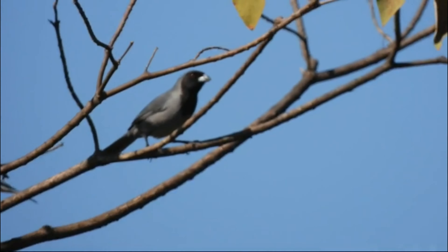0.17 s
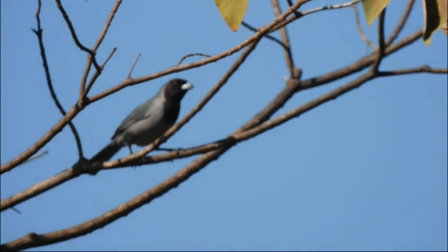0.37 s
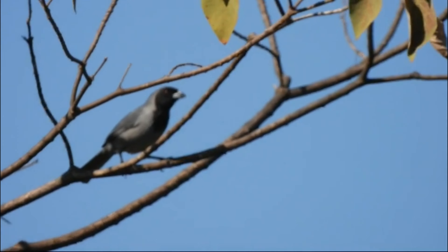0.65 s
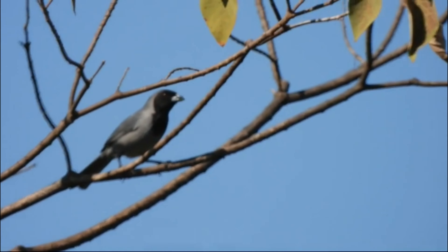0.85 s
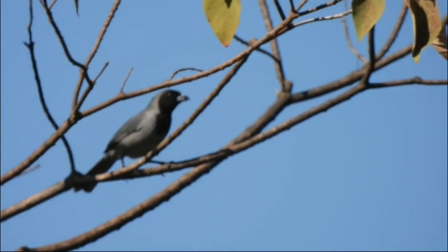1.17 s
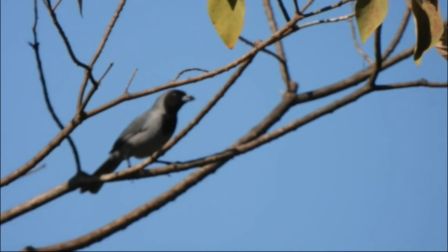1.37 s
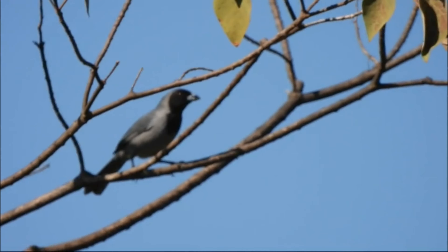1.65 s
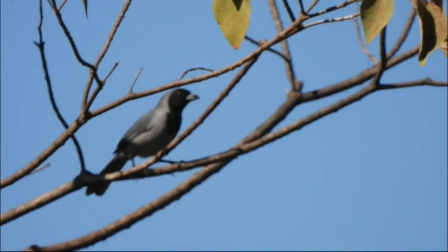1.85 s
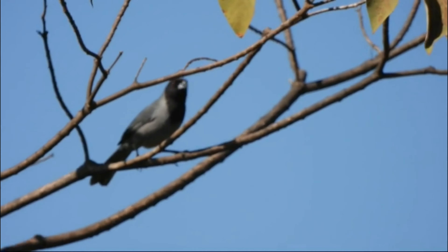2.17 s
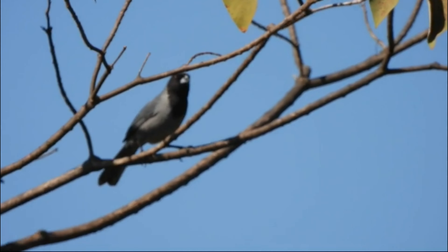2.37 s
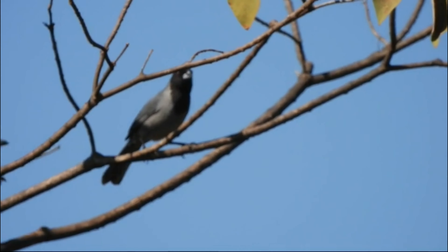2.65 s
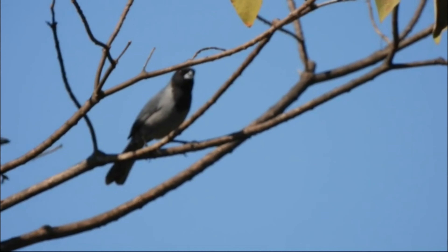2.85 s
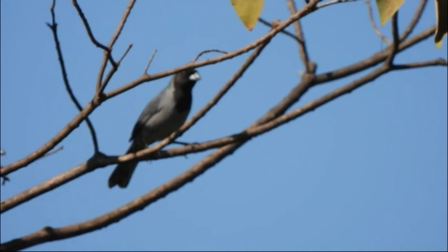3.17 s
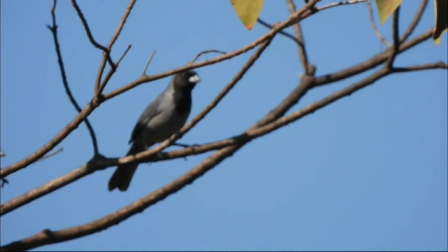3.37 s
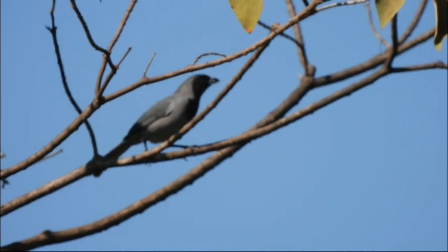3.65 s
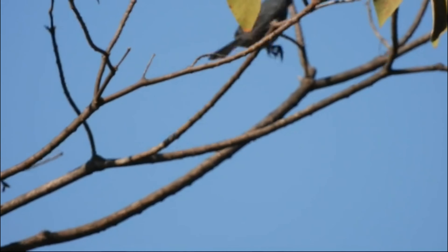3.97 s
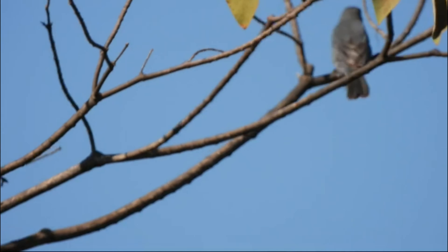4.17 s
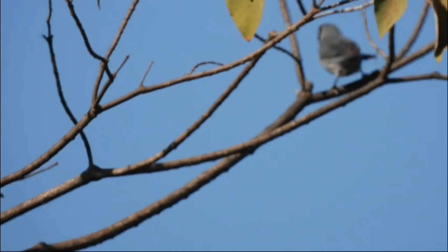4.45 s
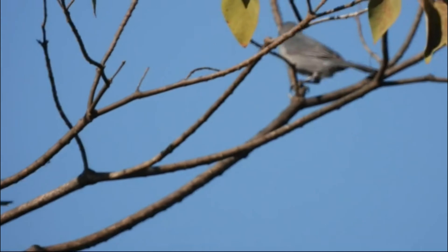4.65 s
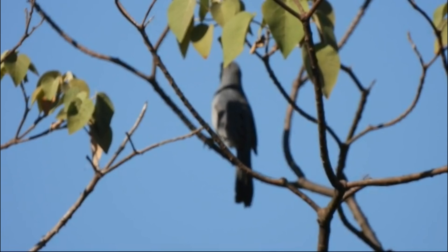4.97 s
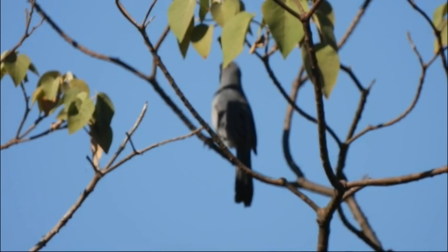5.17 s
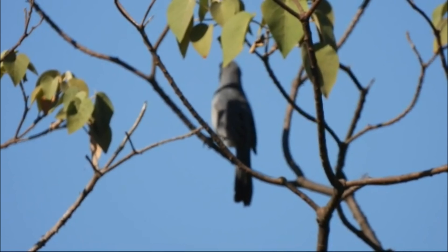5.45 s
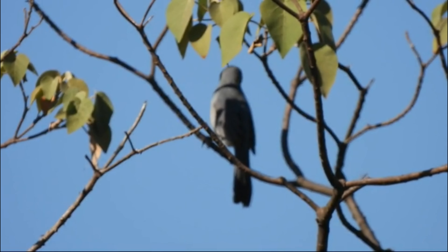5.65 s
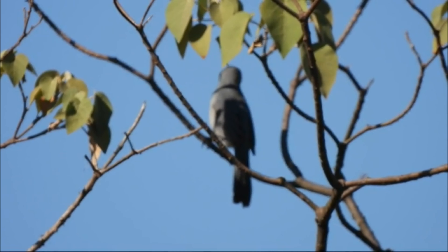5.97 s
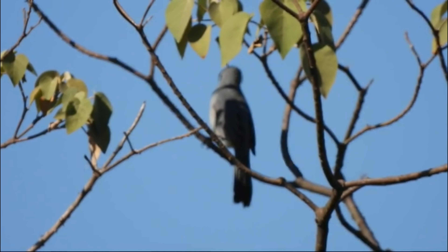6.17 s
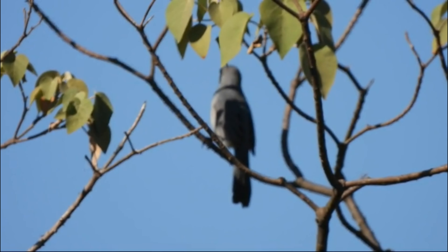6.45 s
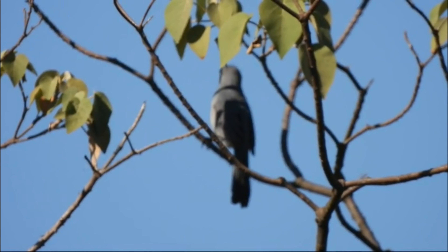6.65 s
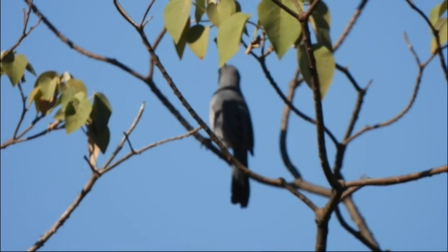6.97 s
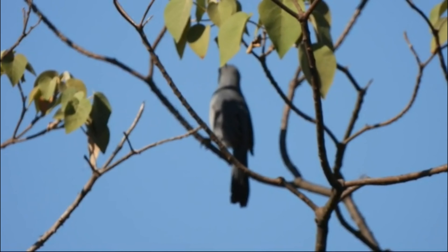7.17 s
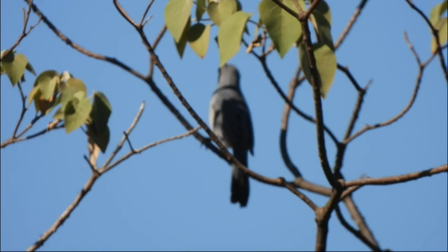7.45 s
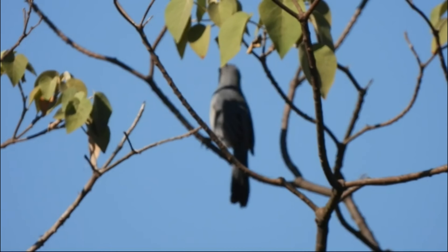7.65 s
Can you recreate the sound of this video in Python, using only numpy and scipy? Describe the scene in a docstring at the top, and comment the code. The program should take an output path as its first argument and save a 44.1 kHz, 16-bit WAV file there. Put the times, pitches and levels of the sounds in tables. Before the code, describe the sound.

From 0 to 3.75 s a nearby songbird whistles clear, rapid notes sliding between roughly 1.7 and 4.2 kHz, about four a second, in four run-together phrases; strong down-slurs stand out near 0.9, 1.8 and 2.6 s. The last phrase slows to a drawl at 3.3 s and a swelling, rising note at 3.55 s. Trees give a long soft echo. Behind are small chips, faint chatter, high insect trills, and low hoarse far-bird notes from 2.75 to 4.25 s. Low hand rumble carries soft thuds, notably at 1.85-2.4 s. The echo cuts off at 4.27 s, the rumble at 4.9 s. Then quiet hiss, sparse distant calls, a brief cricket at 4.3-4.85 s and again from 6.2 s, faint rustles near 7 s, and short chirps from 7.3 s until the end.

```python
"""Four quick phrases of swept whistles from a tanager, echoed by the trees, over a soft outdoor hiss.
Other birds, a cricket and trilling insects call farther off; the camera rumbles and thuds in the hand.
The song's echo stops short at 4.27 s, the rumble at 4.9 s.
Whistles and calls are gliding sines; hiss, rumble, taps and trills are shaped noise;
echoes are delayed copies and sparse random impulse responses."""
import sys
import numpy as np
from scipy import signal
from scipy.fft import rfft, irfft, next_fast_len
from scipy.io import wavfile
from scipy.ndimage import uniform_filter1d

SR = 44100
rng = np.random.default_rng(int(sys.argv[2]) if len(sys.argv) > 2 else 0)


def to_wav(sig):
    """Store sig (one row per channel, or 1-D mono) as 16-bit WAV at the path in sys.argv[1].

    Samples outside -1..1 are clipped; the rate is SR.
    """
    pcm = np.clip(np.atleast_2d(sig), -1, 1) * 32767
    pcm = np.round(pcm).astype(np.int16)
    wavfile.write(sys.argv[1], SR, pcm.T)  # frames by channels


N = 344421
TIME_S = np.arange(N) / SR
ECHO_END_S, RUMBLE_END_S = 4.272, 4.895

# Outdoor hiss spectrum. Each row: frequency in Hz, relative level in dB.
AIR_SPECTRUM = [(15, -27.5), (35, -11), (65, 0.0), (130, -10), (250, -14), (500, -16.5), (1000, -19.5),
                (2000, -18), (3000, -24.5), (4200, -25.5), (6300, -27), (8200, -32), (11500, -36),
                (15000, -40)]
# Handling rumble spectrum. Each row: frequency in Hz, relative level in dB.
RUMBLE_SPECTRUM = [(15, -8.5), (30, -10), (52, 1.5), (68, 0), (85, -14.5), (110, -19), (150, -30),
                   (220, -39), (400, -46.5), (1500, -100)]
# Handling rumble course. Each row: time in seconds, level in dB before the overall rumble gain.
RUMBLE_COURSE = [(0.0, -47.5), (0.58, -52.5), (0.79, -51.5), (1.04, -46), (1.71, -48.5), (2.39, -43.5),
                 (2.53, -46), (2.86, -53.5), (3.25, -52.5), (3.56, -46.5), (3.96, -50.5), (4.42, -45.5),
                 (4.7, -52), (4.84, -50.5)]
# Knocks of the hand on the camera. Each row: start in seconds, level in dB before the soft onset,
# pitch in Hz, decay time constant in seconds.
KNOCKS = [(1.854, -17, 68.3, 0.016), (2.138, -28, 69, 0.048), (2.226, -21.5, 60.8, 0.033),
          (2.415, -20, 58.3, 0.028), (3.872, -30, 94, 0.012), (4.345, -33, 105.7, 0.02),
          (4.48, -25, 55.3, 0.016), (4.849, -31.5, 89.3, 0.019)]
# Dull taps and dry ticks. Each row: start in seconds, level in dB, band centre in Hz,
# decay time constant in seconds.
TAP_EVENTS = [(.129, -36.5, 860, 0.0055), (.798, -47, 1360, 0.0048), (2.63, -37.5, 855, 0.0038),
              (2.537, -36, 2205, 0.0015), (3.75, -54.5, 5200, .009), (5.398, -51.5, 2770, .003),
              (5.398, -54.5, 6130, .004), (7.361, -49.5, 1210, 0.011), (7.398, -48.5, 1340, 0.011)]
# Soft rustles. Each row: start in seconds, level in dB.
RUSTLE_EVENTS = [(6.785, -57), (6.97, -55), (7.191, -53.5)]
# Far trilling insects. Each row: start in seconds, end in seconds, band centre in Hz,
# mean pulses per second, level in dB before pulsing.
INSECT_TRILLS = [(0, 3.3, 7240, 14, -71), (0, 4.27, 6238, 17, -69), (4.301, 6.3, 4720, 15, -73)]
# Cricket bouts. Each row: start in seconds, end in seconds, seconds from chirp to chirp, mean level in dB.
CRICKET_BOUTS = [(4.298, 4.85, .127, -58), (6.177, 7.81, .1235, -59)]
# Low, drawn-out notes of a far bird. Each row: start in seconds, length in seconds,
# fundamental in Hz, mean level in dB, rasp from 0 to 1.
LOW_BIRD_NOTES = [(2.751, 0.25, 614, -52, 0.56), (3.044, .16, 684, -49.5, 0.58),
                  (3.166, 0.24, 638, -50, 0.36), (3.394, 0.16, 638.5, -43.5, .1),
                  (3.748, .52, 634, -53.5, 0.78)]
# Kinds of far call by name. Each entry: rasp from 0 to 1, pitch factors at even steps through the call.
CALL_KINDS = { "down": (0.22, [1.22, 0.94, .78]), "up": (0.22, [.84, .94, 1, 1.04, 1.06]),
              "arch": (0.19, [0.98, 1, 1, .97]), "held": (0.1, [1, 1]), "sag": (.4, [1.06, 0.98, .94]),
              "buzz": (.9, [1.2, 0.94, .94]), "tilde": (0.18, [.96, .91, 1.04, 1.01, 0.97]),
              "vee": (0.5, [1.15, 1, .88, 1.02, 0.81]), }
# Clearer calls of other birds. Each row: start in seconds, kind, length in seconds,
# reference pitch in Hz, mean level in dB.
CLEAR_CALLS = [ (0.259, "down", 0.022, 2980, -43), (0.366, "down", 0.025, 3050, -37.5),
               (0.447, "arch", 0.17, 4700, -59), (0.468, "down", 0.027, 3040, -36.5),
               (0.696, "arch", .06, 5150, -53), (.719, "up", .096, 3410, -47),
               (.725, "up", 0.055, 2620, -51), (0.823, "held", 0.066, 4210, -55),
               (1.032, "arch", .12, 5015, -59), (1.053, "sag", 0.028, 4070, -48),
               (1.1, "up", 0.11, 3850, -49), (1.186, "down", 0.064, 4240, -58.5),
               (1.361, "held", 0.094, 4960, -57), (1.594, "down", .074, 6070, -49),
               (1.593, "down", 0.077, 8300, -56), (1.597, "up", .08, 2580, -50),
               (1.605, "up", .12, 3565, -47.5), (2.001, "buzz", 0.09, 4150, -49),
               (2.39, "up", 0.12, 3480, -51.5), (2.794, "up", 0.065, 3600, -50),
               (2.902, "arch", 0.088, 4900, -55), (3.303, "arch", 0.13, 5080, -62.5),
               (3.557, "held", .056, 5320, -52), (3.661, "arch", .1, 4970, -65.5),
               (3.724, "held", 0.097, 4140, -57.5), (3.986, "held", 0.26, 4160, -61.5),
               (4.036, "held", 0.11, 1860, -57.5), (4.464, "sag", 0.37, 3370, -65),
               (4.466, "sag", .34, 2990, -61), (4.472, "sag", 0.3, 2736, -63),
               (4.893, "up", 0.021, 3550, -57), (4.922, "held", .3, 3024, -64.5),
               (4.93, "held", 0.073, 1950, -62), (4.94, "sag", .17, 2310, -67),
               (5.065, "held", 0.048, 3006, -54), (5.202, "held", .09, 1767, -57.5),
               (5.645, "held", 0.052, 4920, -64), (5.823, "down", 0.09, 4480, -67.5),
               (5.939, "held", 0.081, 3060, -62.5), (6.189, "up", 0.054, 3350, -57),
               (6.224, "down", 0.041, 3270, -60.5), (6.382, "up", 0.0342, 3140, -59),
               (6.404, "arch", 0.088, 3280, -55.5), (6.435, "up", 0.17, 6000, -60),
               (6.472, "sag", 0.18, 3450, -61), (6.502, "sag", 0.28, 2810, -63.5),
               (7.288, "tilde", 0.048, 3230, -50.5), (7.373, "vee", 0.06, 3620, -50.5),
               (7.545, "tilde", 0.082, 3180, -50.5), (7.636, "vee", 0.064, 3600, -47.5),
               (7.777, "up", 0.065, 2980, -53), ]
# Faint chatter. Each row: start in seconds, end in seconds, calls per second,
# mean reference pitch in Hz, mean level in dB.
FAINT_CHATTER = [(0, 2.8, 6, 2726, -51), (4.3, 6.7, 2.5, 2320, -69.5)]
# Reflections from near branches. Each row: delay in seconds, level in dB.
BRANCH_ECHOES = [(.0031, -25), (.0074, -12.5), (0.0115, -22.5), (0.022, -18.5), (0.033, -24.5),
                 (0.045, -24)]
# Passage through the throat. Each row: whistle pitch in Hz, gain in dB.
THROAT_GAIN = [(1700, -17.5), (1950, -8.5), (2150, -5.5), (2400, -2.5), (2850, -1.13), (3200, -1.8),
               (3550, -3.5), (4200, -17.5)]
# Tanager syllables by name; in most, one side of the syrinx leads in and hands over to the other.
# Each entry: handover in seconds, initial lead-in level in dB, dip at the handover in dB,
# release in seconds, swell from start to end in dB, pitch path of (seconds, Hz) points.
# The times of handover and path are before stretching.
SYLLABLE_SHAPES = { "hook": (.027, -13.5, -10, 0.014, 0, [(0, 3582), (.02, 3512), (.075, 2732),
                   (.104, 2700)]), "slur": (0.031, -13, -6, .017, -3.9, [(0, 4218), (.016, 4015),
                   (.04, 3292), (.06, 2891), (.096, 2545)]),
                   "rise": (.04, -12.5, -8, .019, 0.67, [(0, 1850), (.034, 1970), (.072, 2320),
                   (.115, 2572), (.155, 2900), (.195, 3530)]),
                   "peak": (.046, 0, -8.5, 0.024, .4, [(0, 2310), (.034, 3105), (.047, 3797), (.06, 2630),
                   (.075, 2270), (.1, 1910)]), "low": (.037, -13, -18, 0.014, -4.5, [(0, 1683),
                   (.036, 1790), (.052, 1930), (.08, 2060), (.105, 2124)]),
                   "fall": (0, 0, 0, 0.019, .5, [(0, 3130), (.014, 3028), (.052, 2480), (.1, 2010)]),
                   "drawl": (0, 0, 0, 0.018, 0, [(0, 1935), (.042, 2344), (.065, 2362), (.11, 2255),
                   (.215, 2088)]), "query": (0, 0, 0, 0.035, 13.5, [(0, 2054), (.02, 2376), (.1, 2524),
                   (.18, 3040)]), }
# The song. Each row: start in seconds, syllable, length factor, pitch factor,
# level in dB before throat gain and envelopes.
SONG_NOTES = [ (.055, "hook", 0.99, 1, -14), (.298, "rise", .84, 0.99, -15),
              (.513, "peak", 0.93, 1.02, -13), (.761, "low", 1.04, 1.017, -17),
              (0.919, "slur", 1.07, 0.99, -8), (1.147, "rise", 1.026, 1.009, -12),
              (1.389, "peak", 1, .986, -14.5), (1.627, "low", .82, 0.94, -18),
              (1.762, "slur", 0.98, 0.99, -8.5), (1.979, "rise", 1.004, 1.001, -14),
              (2.216, "peak", 1.06, 0.99, -12.5), (2.453, "low", 0.93, 1, -17),
              (2.61, "slur", .96, .979, -9), (2.831, "rise", 0.96, 0.98, -12), (3.066, "fall", 1, 1, -12),
              (3.286, "drawl", 0.95, 1.002, -18), (3.552, "query", 1.008, .997, -20), ]


def gain_of(db):
    """Decibels to amplitude."""
    return 10 ** (np.asarray(db) / 20)


def evened(x):
    """Scales to rms 1."""
    return x / np.sqrt(np.mean(x ** 2) + 1e-20)


def add(mix, start_s, sound):
    """Mixes a sound in at its start time."""
    part = mix[max(round(start_s * SR), 0):][:len(sound)]
    part += sound[:len(part)]


def band_noise(size, centre_hz, width_hz):
    """Noise in one bell-shaped band; centred on zero it is a slow wander."""
    padded = next_fast_len(size + SR // 4)
    hz = np.fft.rfftfreq(padded, 1 / SR)
    bell = np.exp(-2 * ((hz - centre_hz) / width_hz) ** 2)
    return evened(irfft(rfft(rng.standard_normal(padded)) * bell, padded))[:size]


def coloured(spectrum):
    """Steady noise with a given spectrum, interpolated over log frequency."""
    hz, db = np.transpose(spectrum)
    bins_hz = np.fft.rfftfreq(N, 1 / SR)
    shape_db = np.interp(np.log(bins_hz + 1), np.log(hz + 1), db)
    return evened(irfft(rfft(rng.standard_normal(N)) * gain_of(shape_db), N))


def until(end_s):
    """Gate that is open, then closes over the last 5 ms before its end."""
    return np.clip((end_s - TIME_S) * 200, 0, 1)


def scatter(x, t60_s, onset_s, echoes_per_s=2000):
    """Many small echoes of random sign that build up and die away."""
    t = np.arange(2 * SR) / SR
    signs = rng.choice([-1, 1], len(t))
    echoes = signs * (rng.random(len(t)) < echoes_per_s / SR)
    echoes = echoes * (1 - np.exp(-t / onset_s)) * np.exp(-np.log(1000) * t / t60_s)
    return signal.fftconvolve(x, echoes / np.linalg.norm(echoes))[:N]


def outdoor_air(level_db=-56, wander_db=0.56):
    """Coloured noise whose level wanders slowly."""
    return coloured(AIR_SPECTRUM) * gain_of(level_db + wander_db * band_noise(N, 0, 2.1))


def handling(rise_s=0.013, noise_db=-8, rumble_db=3):
    """The camera body rumbles in the hand as low noise and thuds as damped sines with noise."""
    out = coloured(RUMBLE_SPECTRUM) * gain_of(rumble_db + np.interp(TIME_S, *np.transpose(RUMBLE_COURSE)))
    t = np.arange(SR // 3) / SR
    onset = 1 - np.exp(-t / rise_s)
    for start_s, db, hz, decay_s in KNOCKS:
        thud = np.sin(2 * np.pi * hz * t) + gain_of(noise_db) * band_noise(len(t), 89, 52)
        add(out, start_s, gain_of(db) * onset * np.exp(-t / decay_s) * thud)
    return out * until(RUMBLE_END_S)


def noise_swell(db, centre_hz, width_hz, rise_s, decay_s):
    """A band of noise that rises linearly and dies away exponentially."""
    t = np.arange(SR // 4) / SR
    envelope = np.minimum(t / rise_s, 1) * np.exp(-np.maximum(t - rise_s, 0) / decay_s)
    return gain_of(db) * envelope * band_noise(len(t), centre_hz, width_hz)


def taps(width_share=0.44, rise_share=0.3):
    """Short swells of noise: dull taps, dry ticks and soft rustles."""
    out = np.zeros(N)
    for start_s, db, centre_hz, decay_s in TAP_EVENTS:
        add(out, start_s, noise_swell(db, centre_hz, width_share * centre_hz, rise_share * decay_s, decay_s))
    for start_s, db in RUSTLE_EVENTS:
        add(out, start_s, noise_swell(db, centre_hz=3640, width_hz=3200, rise_s=0.039, decay_s=0.039))
    return out


def insect_trills(blur_hz=330):
    """Far trills blur into bands of noise, pulsing at an unsteady rate."""
    out = np.zeros(N)
    for start_s, end_s, hz, pulses_per_s, db in INSECT_TRILLS:
        rate = pulses_per_s * (1 + 0.27 * band_noise(N, 0, 4.0))
        pulses = np.sin(np.pi * np.cumsum(rate) / SR) ** 2
        active = (TIME_S > start_s) * (TIME_S < end_s)
        out += gain_of(db) * pulses * band_noise(N, hz, blur_hz) * active
    return out


def cricket(wing_hz=6130, stroke_s=0.021, spacing_s=0.029, arch_hz=130, jitter_s=0.004, uneven_db=1):
    """Three wing closings a chirp, each a short tone that arches in pitch and level."""
    out = np.zeros(N)
    arch = np.sin(np.pi * np.linspace(0, 1, int(stroke_s * SR)))
    for bout_start_s, bout_end_s, period_s, bout_db in CRICKET_BOUTS:
        for beat_s in np.arange(bout_start_s, bout_end_s, period_s):
            start_s, db = rng.normal([beat_s, bout_db], [jitter_s, uneven_db])
            for k in range(3):
                hz = wing_hz + arch_hz * (arch - 0.75) + 60 * band_noise(len(arch), 0, 530)
                tone = np.sin(2 * np.pi * np.cumsum(hz) / SR)
                add(out, start_s + k * spacing_s, gain_of(db) * np.sqrt(abs(arch)) * tone)
    return out


def low_caller(rasp_depth=0.063, rasp_hz=350, flutter_db=2.5, first_db=-17, third_db=-20):
    """Level notes, clear or hoarse with pitch shake, strongest on their second harmonic."""
    out = np.zeros(N)
    for start_s, length_s, hz, db, rasp in LOW_BIRD_NOTES:
        size = int(length_s * SR)
        shaken_hz = hz * (1 + rasp_depth * rasp * band_noise(size, 0, rasp_hz))
        phase = 2 * np.pi * np.cumsum(shaken_hz) / SR
        tone = gain_of(first_db) * np.sin(phase) + np.sin(2 * phase) + gain_of(third_db) * np.sin(3 * phase)
        level = gain_of(db + flutter_db * band_noise(size, 0, 49))
        add(out, start_s, tone * level * signal.windows.tukey(size, 0.3))
    return out


def far_call(kind, length_s, pitch_hz, db, rasp_depth=0.065, rasp_hz=420, taper=0.2, flutter_db=2.5):
    """A pitch arc shaken according to its rasp; its level flutters on the way through the leaves."""
    rasp, steps = CALL_KINDS[kind]
    u = np.linspace(0, 1, int(length_s * SR))
    hz = pitch_hz * np.interp(u, np.linspace(0, 1, len(steps)), steps)
    hz = hz * (1 + rasp_depth * rasp * band_noise(len(u), 0, rasp_hz))
    level = gain_of(db + flutter_db * band_noise(len(u), 0, 49)) * signal.windows.tukey(len(u), taper)
    return level * np.sin(2 * np.pi * np.cumsum(hz) / SR)


def neighbours(chatter_s=0.06, pitch_spread=0.072):
    """Other birds: the clearer calls, and faint slurs at loose intervals behind them."""
    out = np.zeros(N)
    for start_s, *call in CLEAR_CALLS:
        add(out, start_s, far_call(*call))
    for start_s, end_s, calls_per_s, hz, db in FAINT_CHATTER:
        for slot_s in np.arange(start_s, end_s, 1 / calls_per_s):
            pitch_hz = hz * (1 + pitch_spread * rng.standard_normal())
            call = far_call(rng.choice(["up", "down"]), chatter_s, pitch_hz, db)
            add(out, slot_s + rng.random() / calls_per_s, call)
    return out


def lingering(db=-47, centre_hz=2650, width_hz=850, t60_s=9.3):
    """The wood still rings with earlier phrases: a decaying band of noise."""
    return gain_of(db - 60 * TIME_S / t60_s) * band_noise(N, centre_hz, width_hz)


def trees(x, crown_db=-23, wood_db=-24.5):
    """Single branches, the crown around the bird, then the long ring of the wood from separate trunks."""
    out = gain_of(crown_db) * scatter(x, t60_s=0.24, onset_s=0.015, echoes_per_s=500)
    out += gain_of(wood_db) * scatter(x, t60_s=3.0, onset_s=0.058, echoes_per_s=230)
    for delay_s, db in BRANCH_ECHOES:
        add(out, delay_s, gain_of(db) * x)
    return out


def syllable(name, stretch, pitch, db, second_db=-64, hiss_db=-59, flutter_db=1.03,
             attack_s=0.022, open_s=0.012, break_s=0.0035, lead_in_left=0.32):
    """The syrinx sweeps a nearly pure tone; the throat sets its level and all but removes its overtones."""
    handover_s, lead_in_db, break_db, release_s, swell_db, path = SYLLABLE_SHAPES[name]
    path_s, path_hz = np.transpose(path)
    path_s, opens_s = path_s * stretch, handover_s * stretch
    t = np.arange(0, path_s[-1], 1 / SR)
    hz = pitch * uniform_filter1d(np.interp(t, path_s, path_hz), size=240, mode="nearest")
    waver = 1 + 0.002 * band_noise(len(t), 0, 200)
    phase = 2 * np.pi * np.cumsum(hz * waver) / SR
    tone = np.sin(phase) + gain_of(second_db) * np.sin(2 * phase)
    tone += gain_of(hiss_db) * band_noise(len(t), 11500, 3000)
    level_db = db + np.interp(hz, *np.transpose(THROAT_GAIN))
    level_db += swell_db * (t / t[-1] - 0.5) + flutter_db * band_noise(len(t), 0, 89)
    # lead_in_left: share of the lead-in's dB still left at the handover
    level_db += lead_in_db * np.interp(t, [0, opens_s, opens_s + open_s], [1, lead_in_left, 0])
    level_db += break_db * np.exp(-((t - opens_s) / break_s) ** 2)
    edges = np.minimum(t / attack_s, 1) * np.minimum((t[-1] - t) / release_s, 1)
    return tone * gain_of(level_db) * edges


def tanager():
    """The song, syllable after syllable."""
    out = np.zeros(N)
    for start_s, name, stretch, pitch, db in SONG_NOTES:
        add(out, start_s, syllable(name, stretch, pitch, db))
    return out


def scene(far_wet_db=-10):
    """The near singer and its echo over the far life of the wood."""
    far = neighbours() + low_caller() + cricket() + insect_trills()
    far = far + gain_of(far_wet_db) * scatter(far, t60_s=0.65, onset_s=0.015)
    song = tanager()
    song = (song + trees(song) + lingering()) * until(ECHO_END_S)
    return (outdoor_air() + handling() + taps() + far + song)[None]


def record(dry, edge_hz=15720):
    """Linear-phase low-pass that limits the treble."""
    low_pass = signal.firwin(1023, edge_hz, window=("kaiser", 9), fs=SR)
    return signal.oaconvolve(dry, low_pass[None], "same")


dry = scene()
out = record(dry)
to_wav(out)
```